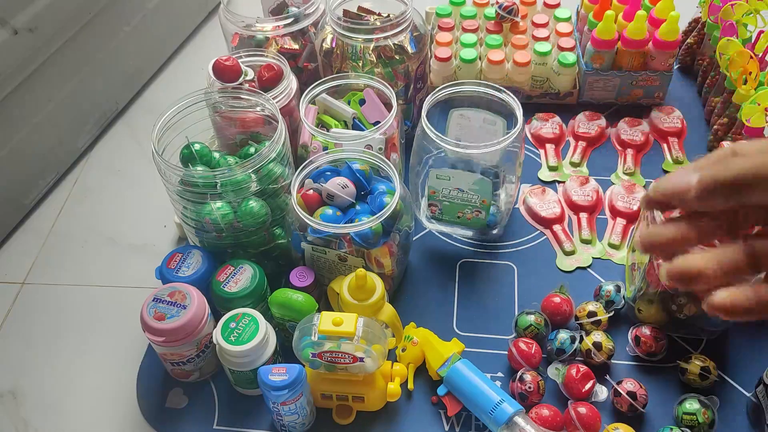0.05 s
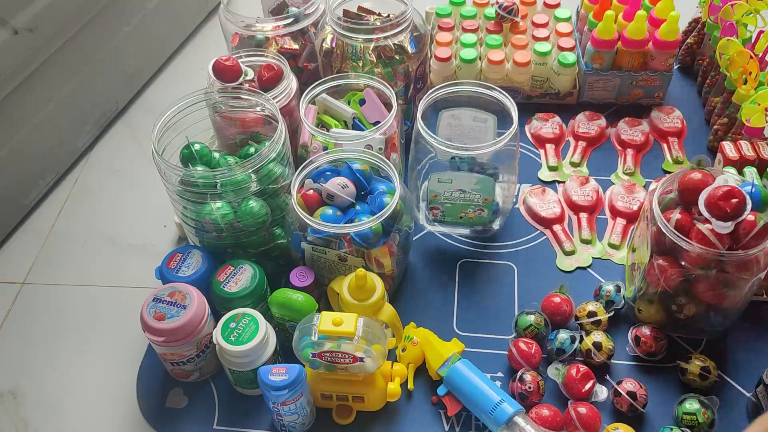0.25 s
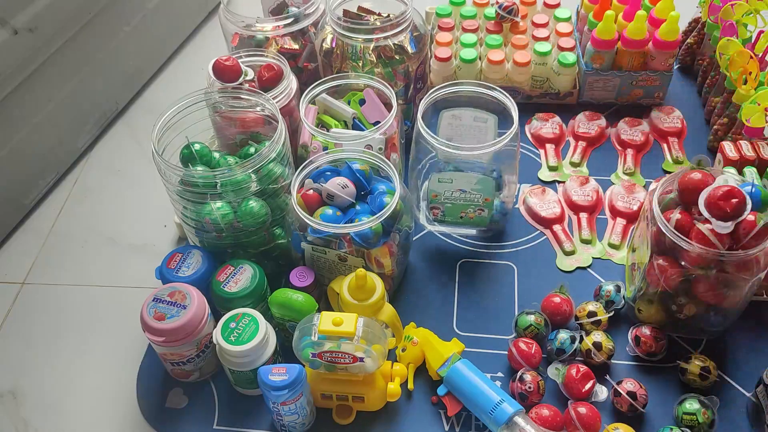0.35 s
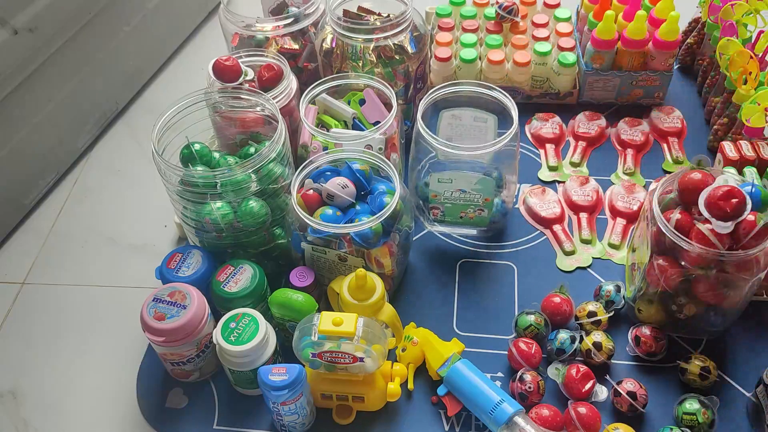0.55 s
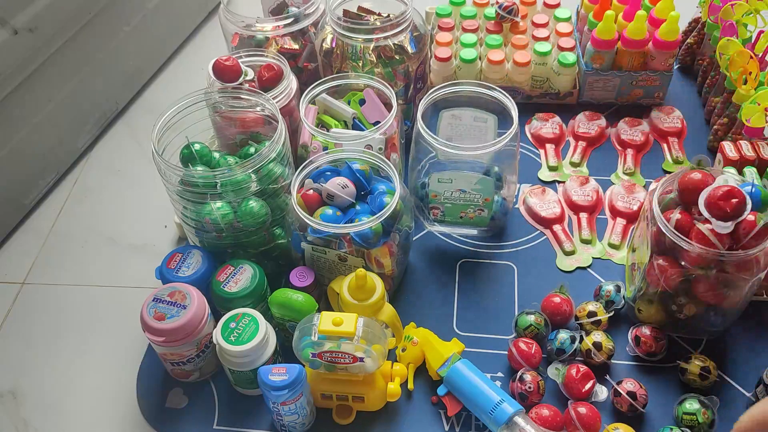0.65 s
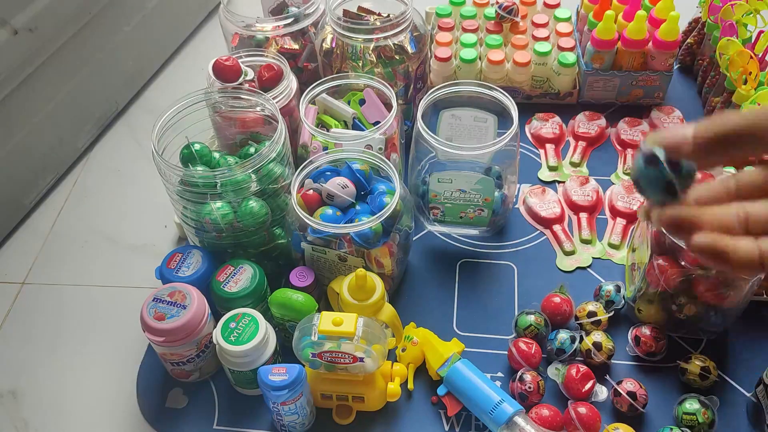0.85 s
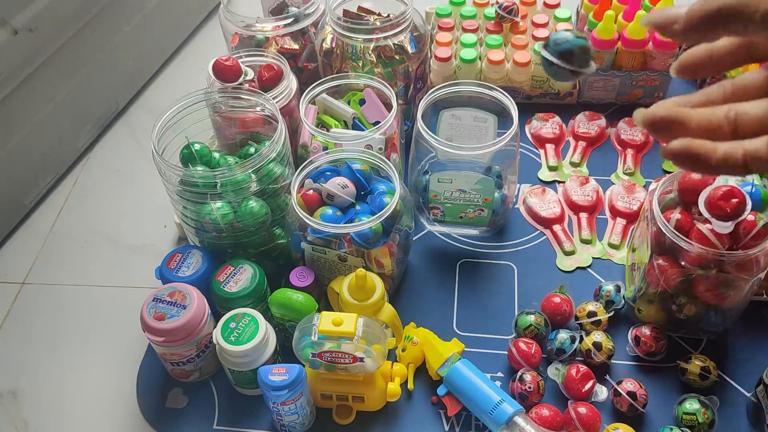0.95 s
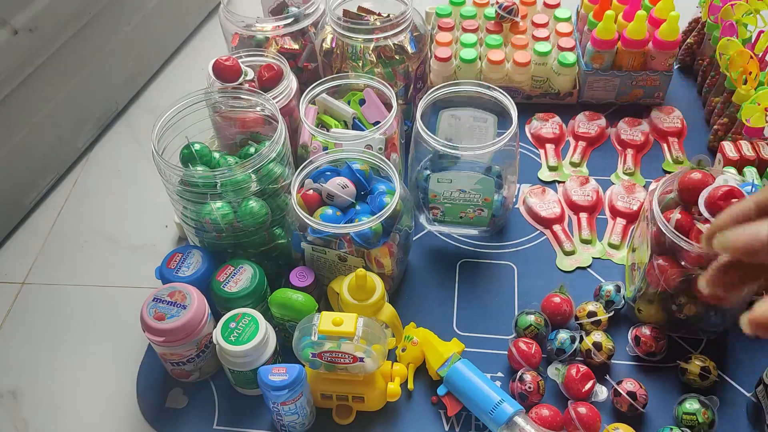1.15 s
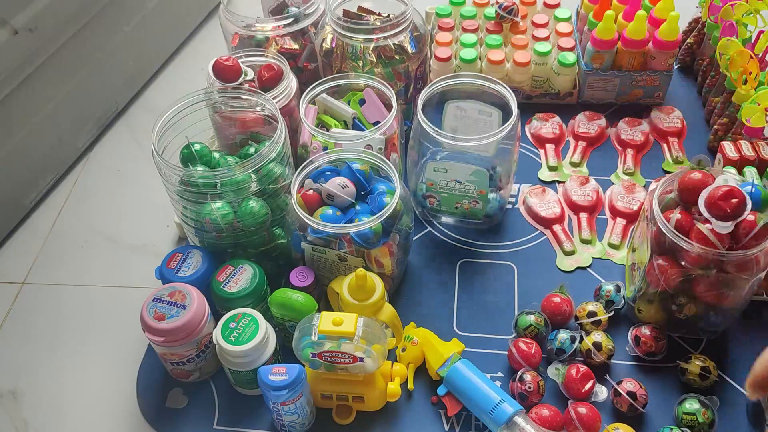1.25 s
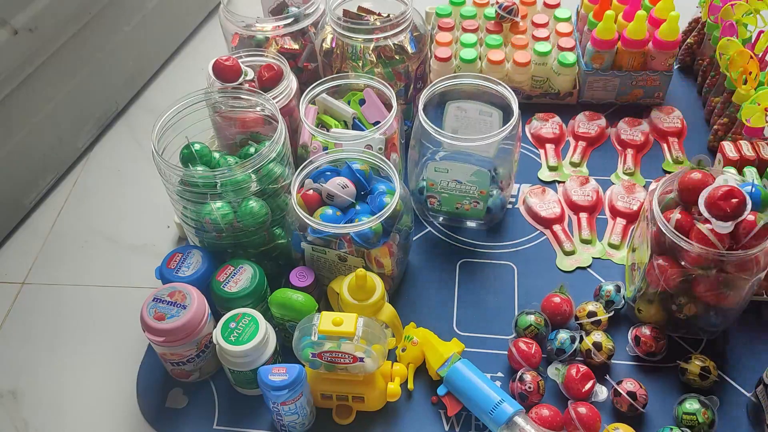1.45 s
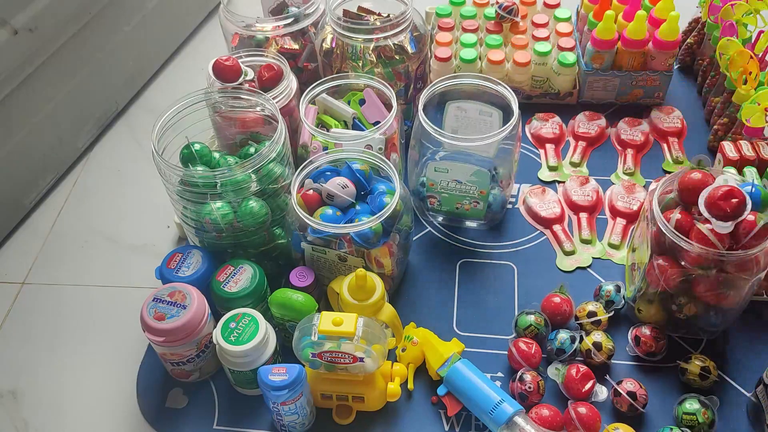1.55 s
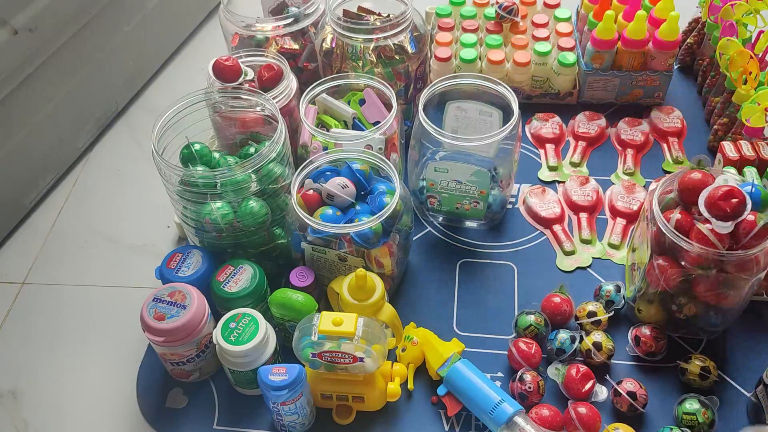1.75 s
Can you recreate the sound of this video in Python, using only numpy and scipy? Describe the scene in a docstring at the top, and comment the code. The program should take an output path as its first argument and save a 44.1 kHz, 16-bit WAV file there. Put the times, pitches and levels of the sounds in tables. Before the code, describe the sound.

Hard candies knock in a plastic jar. At 0.2 seconds the first hits with bright, sharp clacks and a hollow low ring, rebounds around 0.5 and 0.6, then taps and rolls very faintly until about 1.2. At 1.3 the second lands, slightly duller, rattling in close knocks to 1.6 and fading by 1.8. Short bare-room reverberation, faint hiss and low rumble; close stereo pickup.

```python
"""In a bare tiled room, two hard round candies are tossed one after the other into an empty plastic jar.
Each ticks on the rim, knocks on the bottom and bounces to rest. Ringing tones make the boom of the jar's
air and base and the knock of its wall; short noise bursts make the cracks of hard contact.
Brief notes add light taps and chinks, and noise-driven tones add rolling.
Fading noise makes the room ring on, over a faint hiss and a low rumble."""
import sys
import numpy as np
from scipy import signal
from scipy.fft import rfft, irfft
from scipy.io import wavfile

SR = 44100
rng = np.random.default_rng(int(sys.argv[2]) if len(sys.argv) > 2 else 0)


def unload_wav(signal):
    """Save mono or channel-first audio to the path in sys.argv[1] as 16-bit WAV at rate SR, clipped to [-1, 1]."""
    wavfile.write(
        sys.argv[1],
        SR,
        np.round(np.clip(np.atleast_2d(signal).T, -1, 1) * 32767).astype(np.int16),
    )


def to_linear_factor(level_db):
    """Convert decibel levels (scalar or array-like) to linear amplitude factors."""
    exponent = np.asarray(level_db, float) / 20
    return 10 ** exponent


N = 79380   # length in samples: 1.8 s

# Contacts of the candies with the jar. Each row: start in seconds, wall knock in relative dB,
# boom in relative dB, crack in relative dB, favoured wall pitch in Hz, favoured boom pitch in Hz.
CONTACTS = [(0.21,-17,-18,-21.5,797,323.4), (0.2133,-40,-13.5,-50,547,401), (0.2301,-3,-29.5,-14,1289,503),
            (0.233,-10,-17,-45,1820,294), (0.2696,-11.5,-18.5,-20,1055,324), (0.294,-16.5,-25,-45,717,467),
            (0.32,-39,-27.5,-27,1730,503), (0.397,-50,-51.5,-42,1800,450), (0.416,-33,-40,-38,1800,450),
            (0.486,-19.5,-28,-38,950,430), (0.581,-28,-39.5,-48,810,354), (0.624,-21,-39,-33.5,887,480),
            (0.641,-16,-32.5,-32,1237,471), (0.745,-33.5,-83,-66.5,907,425), (0.812,-46.5,-82,-71,1113,395),
            (0.954,-65,-74,-59.5,1800,487), (0.973,-70,-73,-64,2000,480), (1.203,-61.5,-75.5,-70,754,150),
            (1.3203,-32,-24,-22.5,1520,488), (1.331,-21,-19,-25.5,696,274), (1.343,-21,-20,-28.5,700,500),
            (1.365,-11,-22.5,-31.5,996,450), (1.409,-27,-28,-42,1384,242.6),
            (1.4712,-15,-28.5,-36.5,770,446), (1.508,-21,-24,-37,1040,450), (1.569,-23,-60,-49,1190,235),
            (1.585,-29.5,-33.5,-56,656,240), (1.608,-38.5,-36,-71.5,720,450), (1.683,-50,-54,-64,1720,175),
            (1.711,-33.5,-45,-73.5,658,172), (1.765,-49,-58.5,-80.5,713,173)]


def at_hz(points, hz):
    """Reads a table of (Hz, value) at any pitch, along a logarithmic pitch scale."""
    table_hz, values = np.transpose(points)
    return np.interp(np.log(hz), np.log(table_hz), values)


def rms_one(x):
    """Scales a sound to an average (rms) level of one."""
    return x / np.sqrt(np.mean(x ** 2) + 1e-20)


def colour(x, points, share=1):
    """Shapes the spectrum by a (Hz, dB) table; a mirrored copy at the end keeps the edges quiet."""
    mirrored = np.concatenate([x, x[..., ::-1]], axis=-1)
    hz = np.maximum(np.arange(N + 1) * SR / (2 * N), 1)
    shaped = rfft(mirrored) * to_linear_factor(share * at_hz(points, hz))
    return irfft(shaped, 2 * N)[..., :N]


def click(seconds, db):
    """A single-sample click: the sudden push of a light contact."""
    return to_linear_factor(db) * (np.arange(N) == int(seconds * SR))


def ring(clicks, hz, t60, swell_t60):
    """A push sets a sine ringing: it swells, then dies by 60 dB in about t60 seconds."""
    r, q = to_linear_factor(-60 / (t60 * SR)), to_linear_factor(-60 / (swell_t60 * SR))   # what is left after one sample
    w = 2 * np.pi * hz / SR
    rung = signal.lfilter([0, np.sin(w)], [1, -2 * r * np.cos(w), r * r], clicks + 1e-18)
    # a second, faster-dying resonance rounds off the start
    return signal.lfilter([(1 - q * q) / 2, 0, (q * q - 1) / 2], [1, -2 * q * np.cos(w), q * q], rung)


def short_notes(rows, t60):
    """Each light contact rings one short tone; rows hold seconds, dB and Hz."""
    return sum(ring(click(s, db), hz, t60, swell_t60=0.0049) for s, db, hz in rows)


def stereo_pair(mid, side, alike):
    """Mixes two independent noises into left and right that are alike by the given amount (0 to 1)."""
    return np.sqrt(1 + alike) * mid + np.sqrt(1 - alike) * side * [[1], [-1]]


def stereo_bands(size, likeness, shape):
    """Adds third-octave bands of stereo noise, each times shape(hz)."""
    edges_hz = 22 * 2 ** np.arange(0, 9.6, 1 / 3)
    white = rng.standard_normal((2, 2, size))   # neighbouring bands take different noise
    out = 0
    for k, (low, high) in enumerate(zip(edges_hz, edges_hz[1:])):
        band = signal.butter(2, [low, high], "band", fs=SR, output="sos")
        mid, side = signal.sosfilt(band, white[k % 2])
        hz = np.sqrt(low * high)
        out = out + shape(hz) * stereo_pair(mid, side, at_hz(likeness, hz)) / np.sqrt(2)
    return out


def background_floor():
    """Steady stereo noise: a faint hiss with more weight in the low tones."""
    # Spectrum. Each row: pitch in Hz, relative level in dB per Hz.
    spectrum = [(12, -33), (20, -6.5), (98, 2.5), (328, -18.5), (558, -37.5), (802, -16.5), (949, -28),
                (1030, -21.5), (1710, -29.5), (2020, -28), (3340, -29.5), (7400, -36.5), (8200, -27.5),
                (9200, -37.5), (16000, -67.5)]
    # How alike left and right are. Each row: pitch in Hz, likeness from 0 to 1.
    likeness = [(30, 0.94), (150, 0.74), (600, 0.26), (2000, .2), (8000, 0.11)]
    noise = stereo_bands(N + SR, likeness, lambda hz: to_linear_factor(at_hz(spectrum, hz)))
    return to_linear_factor(-63) * rms_one(noise[:, SR:])   # the filters settle in the dropped first second


def rumble():
    """A low rumble from outside: a narrow band of noise whose level rises and falls."""
    # Level over time. Each row: time in seconds, level in dB.
    levels = [(0, -67.5), (.2, -55.5), (0.799, -74), (1, -73.5), (1.151, -72), (1.3, -79), (1.8, -74)]
    s, db = np.transpose(levels)
    band = signal.butter(2, [104.8, 175], "band", fs=SR, output="sos")   # Hz
    noise = signal.sosfilt(band, rng.standard_normal(N + SR))[SR:]
    return to_linear_factor(np.interp(np.arange(N) / SR, s, db)) * rms_one(noise)


def taps():
    """Light taps of a stick on the jar's wall, each a single short tone."""
    # Each row: start in seconds, level in dB, pitch in Hz.
    rows = [(.173, -44, 1947), (0.87, -47.5, 1814), (1.205, -56.5, 1448), (1.255, -62, 2040),
            (1.405, -35, 1760), (1.431, -32, 1770), (1.547, -39, 2055), (1.682, -43.5, 1800)]
    return short_notes(rows, t60=0.023)


def room(x):
    """Dense reflections: one second of noise that builds up and dies band by band."""
    # Fading time of the tail. Each row: pitch in Hz, time to die by 60 dB in seconds.
    fade = [(100, 1), (300, 0.69), (800, 0.49), (2000, 0.46), (5000, 0.51), (12000, 0.37)]
    # Strength of the tail. Each row: pitch in Hz, relative energy in dB.
    strength = [(100, -3), (300, -7), (800, -0.5), (2000, -1), (5000, -3), (12000, -2.5)]
    # Build-up of the tail. Each row: pitch in Hz, time in seconds.
    onset = [(100, .003), (1000, 0.0032), (4000, 0.0052), (12000, 0.022)]
    # How alike left and right are. Each row: pitch in Hz, likeness from 0 to 1.
    likeness = [(100, 1), (300, 1), (800, 0.56), (2000, 0.6), (8000, 0.058)]
    t = np.arange(SR) / SR

    def decay(hz):
        """Level of one band over time: reflections gather, then fade steadily in dB."""
        t60 = at_hz(fade, hz)
        same_energy = np.sqrt(2 * np.log(1000) / (t60 * SR))   # evens out long and short tails
        build_up = 1 - np.exp(-(t / at_hz(onset, hz)) ** 2)
        return to_linear_factor(at_hz(strength, hz) - 60 * t / t60) * same_energy * build_up

    tail = stereo_bands(SR, likeness, decay)
    return signal.fftconvolve(x[None], tail, axes=1)[:, :N]


def struck(modes, db, favoured_hz, reach_oct, swell_t60, sign, detune, spread_db):
    """Every contact rings all modes (natural tones), strongest near its favoured pitch.

    Neighbouring modes start alike if sign is positive, opposed if it is negative."""
    lag_spread_s, pan_spread_db = 0.00023, 3.5   # typical left-right differences of each mode
    second_drop_s = 1.3   # from here on a candy lies in the jar
    lead = 64   # samples of room for the early ear
    at = (np.array(CONTACTS)[:, 0] * SR).astype(int)
    spot, pan, lag, bend = np.moveaxis(rng.standard_normal((len(at), len(modes), 4)), 2, 0)
    out = np.zeros((2, N + 4 * SR))
    for k, (hz, empty_db, filled_db, t60) in enumerate(modes):
        mode_db = np.where(at < second_drop_s * SR, empty_db, filled_db) + spread_db * spot[:, k]
        far_db = 6.98 * (np.log2(hz / favoured_hz) / reach_oct) ** 2
        size = -sign ** k * to_linear_factor(db + mode_db - far_db)
        for i, start in enumerate(at - lead):
            clicks = np.zeros((2, int((t60 + swell_t60) * SR) + 2 * lead))
            for ear, side in enumerate([.5, -.5]):
                place = lead + round(side * lag_spread_s * SR * lag[i, k])
                clicks[ear, place] = size[i] * to_linear_factor(side * pan_spread_db * pan[i, k])
            bent_hz = hz * (1 + detune * bend[i, k])
            out[:, start:start + clicks.shape[1]] += ring(clicks, bent_hz, t60, swell_t60)
    return out[:, :N]


def boom(db, favoured_hz):
    """The air and base of the jar ring low, differently once a candy lies inside."""
    # Each row: pitch in Hz, relative dB when empty, relative dB with a candy inside,
    # time to die by 60 dB in seconds.
    modes = [(139.7, -7, -5, 0.48), (172, -13, -12.5, 0.75), (191, -7.5, -4, 0.38), (233.4, -3.5, -3, 0.32),
             (294, -3.5, -11, 0.21), (338, -13.5, -33, 0.13), (365.6, -9.5, -9.5, 0.35),
             (401, -7, -15, 0.14), (430, -1, -11, 0.4), (450, -7.5, -8.5, 0.25), (490.6, 6.5, 4.5, 0.084),
             (561.5, -11, -16.5, 0.14)]
    return struck(modes, db - 6, favoured_hz, reach_oct=1.26, swell_t60=0.023,
                  sign=-1.0, detune=0, spread_db=2.65)


def wall_knock(db, favoured_hz):
    """The wall rings briefly; each contact bends it differently and so shifts its pitches a little."""
    # Each row: middle pitch in Hz, relative dB when empty, relative dB with a candy inside,
    # time to die by 60 dB in seconds.
    modes = [(610, -2, 8, 0.014), (680.7, -3, -2.5, 0.059), (733, -5.5, -9.5, 0.071),
             (808.6, -6, -10, 0.068), (891, -2, -9.5, .04), (960, -0.5, -6.5, 0.026), (1020, -3, -8, 0.004),
             (1212, -11, -13.5, 0.046), (1289, -0.5, -1.5, 0.018), (1550, -7.5, -8.5, 0.023),
             (1583, 0.5, -12.5, 0.016), (1783, 0.5, -7.5, 0.042), (1914, -1.5, -8, 0.033),
             (2130, -6.5, -13.5, 0.036), (2479, 1.5, 0, 0.024), (2976, 2.5, 5, 0.016),
             (3190, 5.5, -10, 0.014)]
    # a sign just under one also makes each later mode 1 % weaker
    return struck(modes, db - 7.5, favoured_hz, reach_oct=0.79, swell_t60=0.0052,
                  sign=0.99, detune=.022, spread_db=2.5)


def crack(db):
    """The hard contact: a short burst of bright noise with a very quick rise."""
    # Spectrum. Each row: pitch in Hz, relative level in dB per Hz.
    spectrum = [(400, -37.5), (900, -7), (1530, -6), (2500, -14.5), (3200, -11), (4400, -13), (5500, -17),
                (6500, -11.5), (7100, -11.5), (7900, -13.5), (9220, -21), (9920, -27.5), (13100, -34),
                (14000, -43), (15300, -46.5), (16000, -49.5)]
    t60_s, rise_s = 0.034, 0.00046
    t, envelope = np.arange(N) / SR, np.zeros(N)
    for s, level_db in zip(np.array(CONTACTS)[:, 0], db - 1):
        age = np.maximum(t - s, 0)
        envelope += to_linear_factor(level_db - 60 * age / t60_s) * (1 - np.exp(-age / rise_s))
    mid, side = rng.standard_normal((2, N))
    noise = stereo_pair(mid, side, alike=0.38)
    return envelope * rms_one(colour(noise, spectrum))


def chinks():
    """The hard candy itself chinks on its sharpest contacts: one short high tone each."""
    # Each row: start in seconds, level in dB, pitch in Hz.
    rows = [(.211, -23.5, 8100), (.2312, -13, 7044), (.3205, -46, 7450), (1.322, -22, 7620),
            (1.3225, -20, 6540), (1.472, -48, 5760)]
    return short_notes(rows, t60=.014)


def notes():
    """On the heavier blows single tones of the jar stand out, swelling over some cycles, then dying."""
    # Each row: start in seconds, level in dB, pitch in Hz, time to die by 60 dB in seconds.
    rows = [(.212, -15.5, 446, 0.045), (.232, -22, 294, 0.22), (0.2318, -15, 937, 0.025),
            (.272, -21, 491, 0.13), (.487, -22, 891, 0.037), (.63, -36, 234.7, 0.3),
            (.641, -22, 1800, .022), (1.328, -19.5, 233.9, 0.49), (1.334, -26.5, 145.6, .6),
            (1.336, -16, 489.5, 0.14), (1.363, -23.5, 905, 0.058), (1.472, -31, 646, .05),
            (1.5, -30, 290, 0.14), (1.712, -42.5, 172, 0.28)]
    swell_cycles = 12.5
    return sum(ring(click(s, db), hz, t60, swell_cycles / hz) for s, db, hz, t60 in rows)


def rolls():
    """The candy rolls along the base: a landing starts a few tones, then soft noise drives them."""
    # Each row: start in seconds, length in seconds, level in relative dB.
    rows = [(0.867, 0.1, -54), (1.085, 0.14, -66)]
    # Each row: pitch in Hz, level in relative dB, time to die by 60 dB in seconds.
    tones = [(452.7, -8, 0.24), (490, 0.5, 0.099), (680, -12, 0.19)]
    fade_db_per_s, landing_db = 96, 8.5   # the landing is set above the roll's own level
    t = np.arange(N) / SR
    drive, landing = np.zeros(N), np.zeros(N)
    for s, length, db in rows:
        rolling = (t > s) * (t < s + length)
        drive += to_linear_factor(db - fade_db_per_s * np.clip(t - s, 0, length)) * rolling
        landing += click(s, db + landing_db)
    noise = drive * rng.standard_normal(N)
    out = np.zeros(N)
    for hz, db, t60 in tones:
        even = np.sqrt(4 * np.log(1000) / (t60 * SR))   # keeps long tones from piling up
        out += to_linear_factor(db) * ring(even * noise + landing, hz, t60, swell_t60=0.023)
    return out


def scene():
    """Adds up the jar's sounds, their echo in the room, the noise floor and the rumble."""
    s, wall_db, boom_db, crack_db, wall_hz, boom_hz = np.transpose(CONTACTS)
    low = boom(boom_db, boom_hz) + notes()
    knock = wall_knock(wall_db, wall_hz) + crack(crack_db)
    light = taps() + chinks() + rolls()
    left, right = low + knock + light
    left_lag_s = .0001   # the direct sound reaches the left side a little later
    late_left = np.interp(np.arange(N) - left_lag_s * SR, np.arange(N), left)
    floor = background_floor()
    # taps, chinks and rolls are narrow and close: less of them fills the room
    send = (knock + low).mean(axis=0) + to_linear_factor(-4.5) * light
    return np.array([late_left, right]) + room(send) + floor + rumble()


def top_cut(x):
    """Nothing passes above the cut-off."""
    return signal.sosfilt(signal.butter(12, 15800, fs=SR, output="sos"), x)


def record(dry):
    """Two unequal microphones: left and right each take half of their difference in tone."""
    # Each row: pitch in Hz, left minus right in dB.
    sides = [(60, -4.5), (180, -1.5), (550, -4), (1650, -3.5), (4970, 1), (15000, -10)]
    left = colour(dry[0], sides, share=.5)
    right = colour(dry[1], sides, share=-.5)
    return top_cut(np.array([left, right]))


dry = scene()
out = record(dry)
unload_wav(out)
```